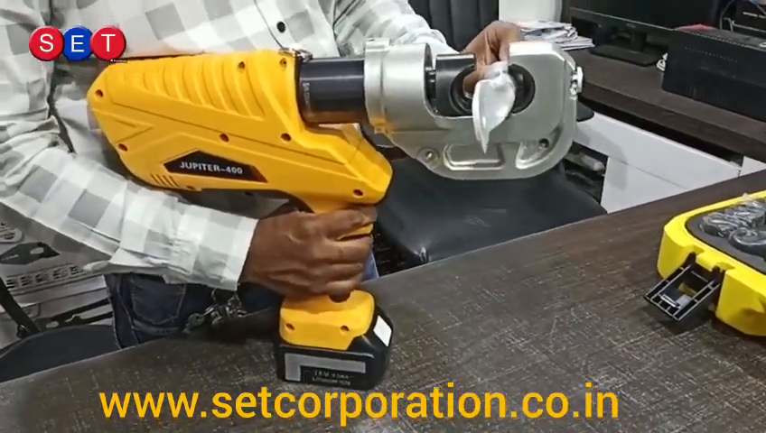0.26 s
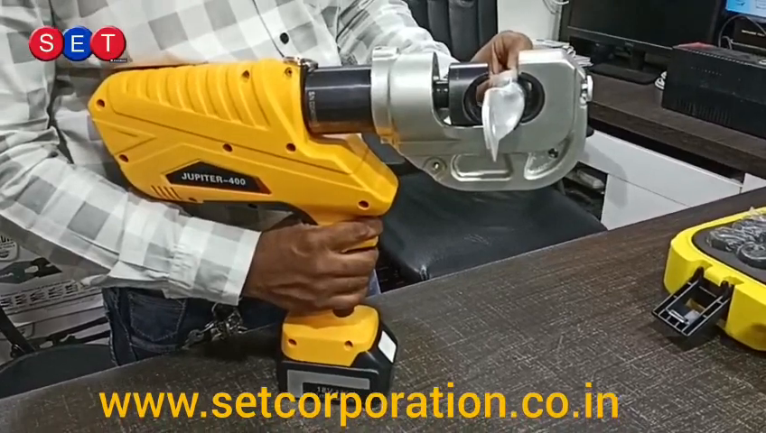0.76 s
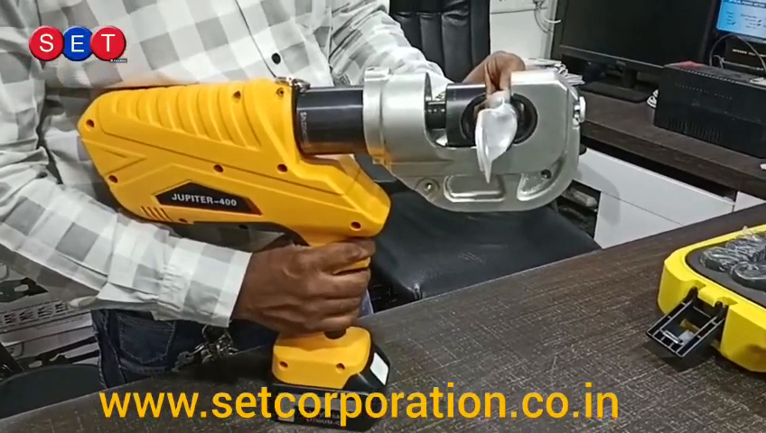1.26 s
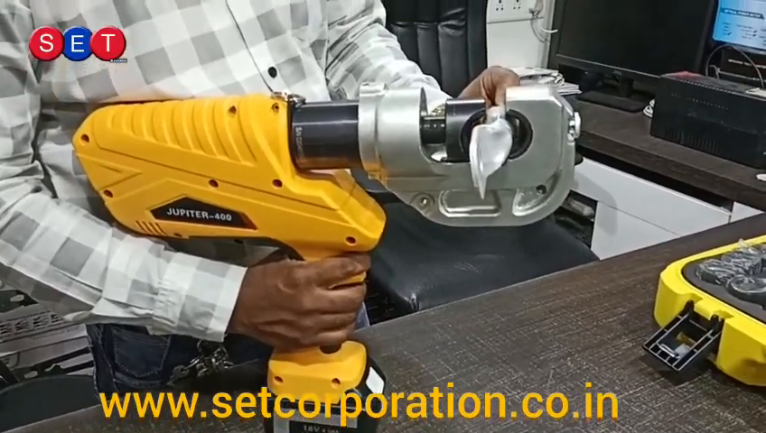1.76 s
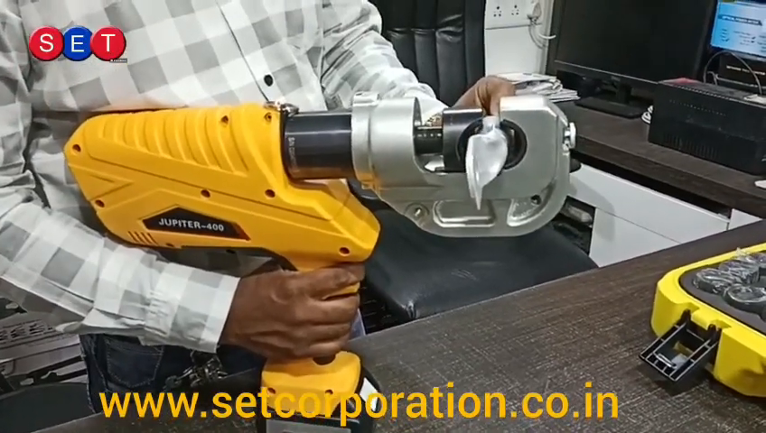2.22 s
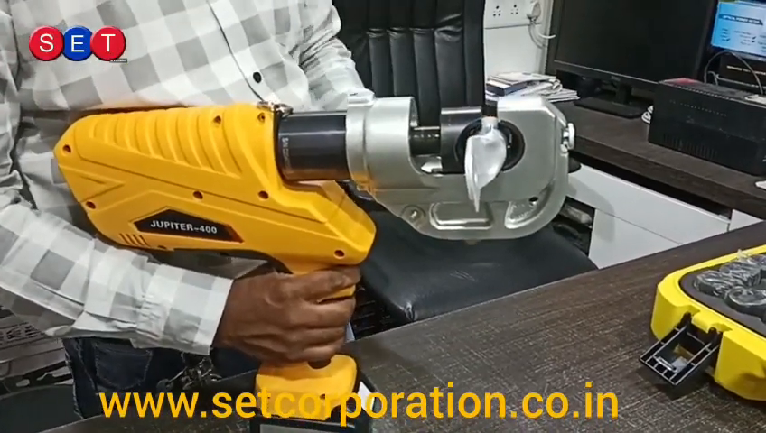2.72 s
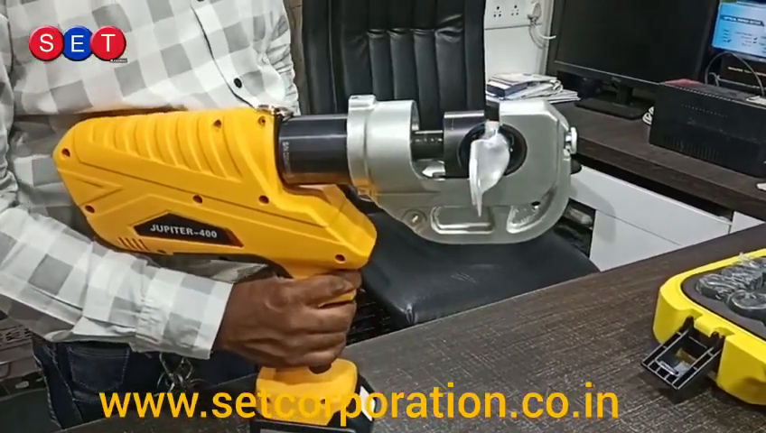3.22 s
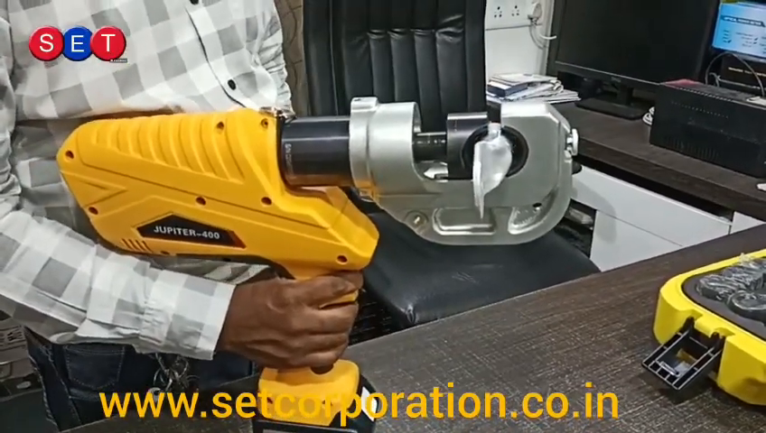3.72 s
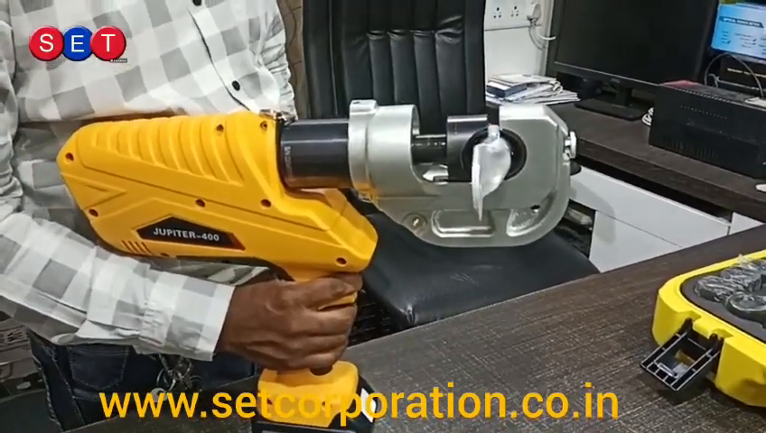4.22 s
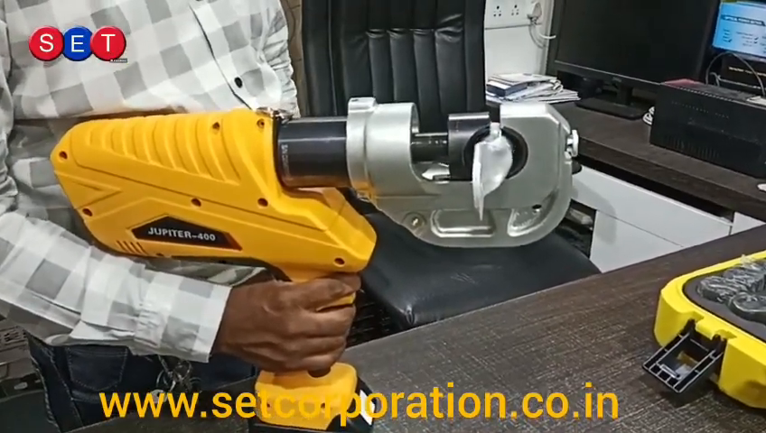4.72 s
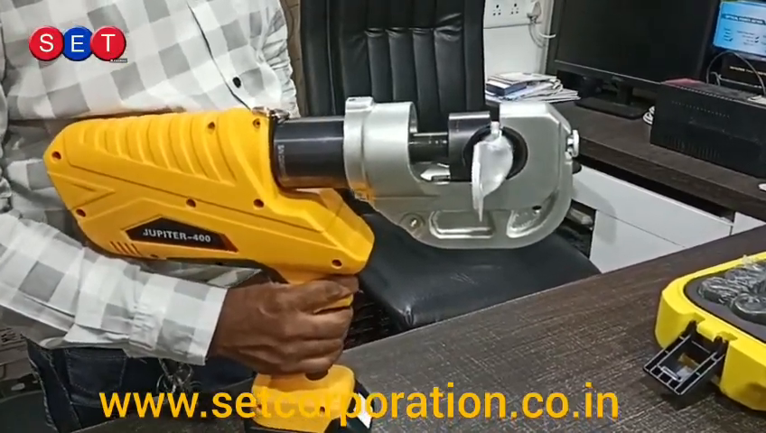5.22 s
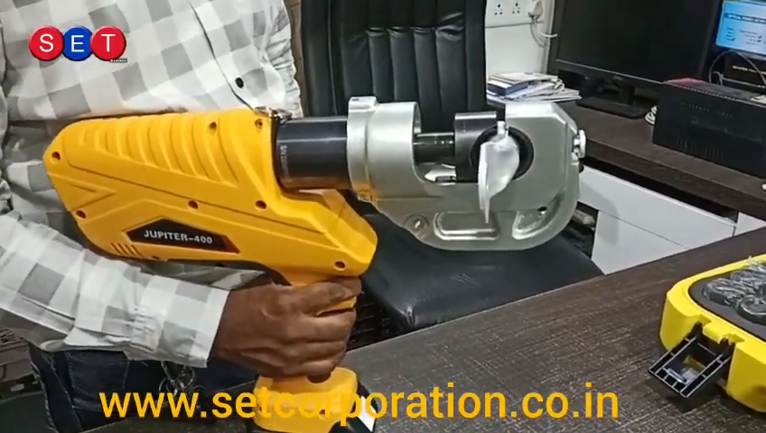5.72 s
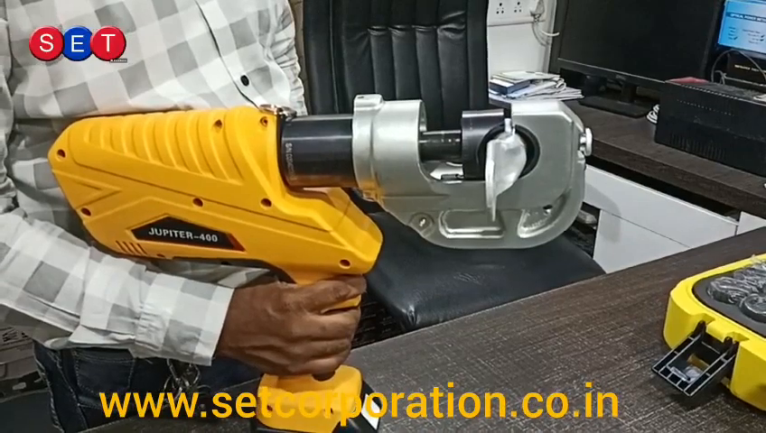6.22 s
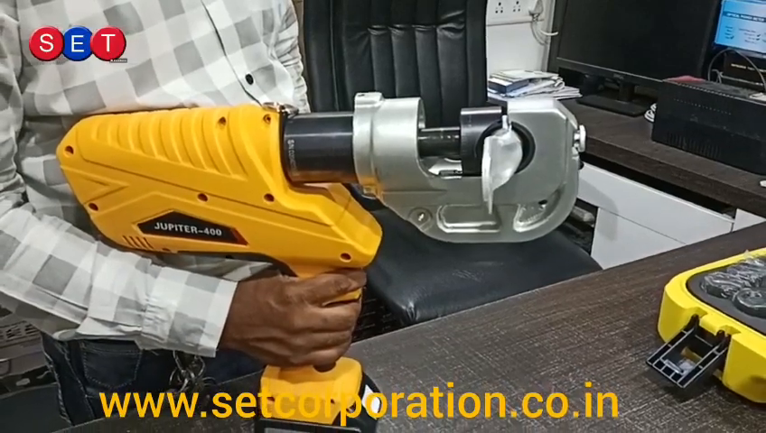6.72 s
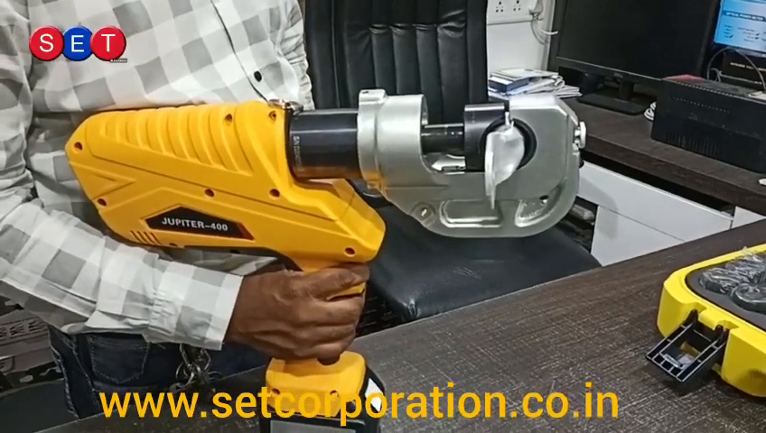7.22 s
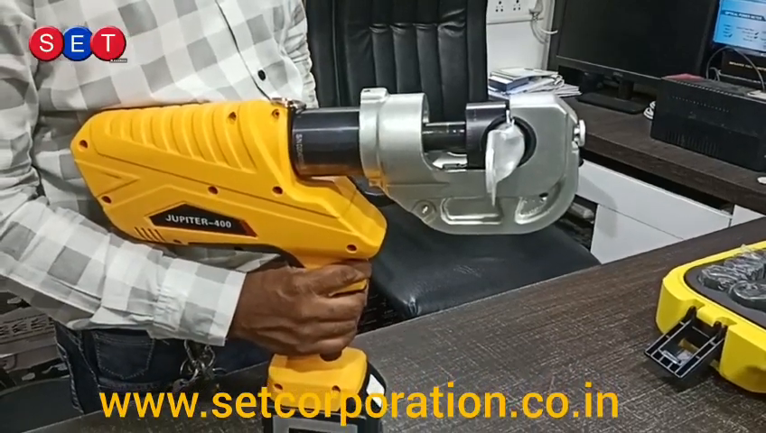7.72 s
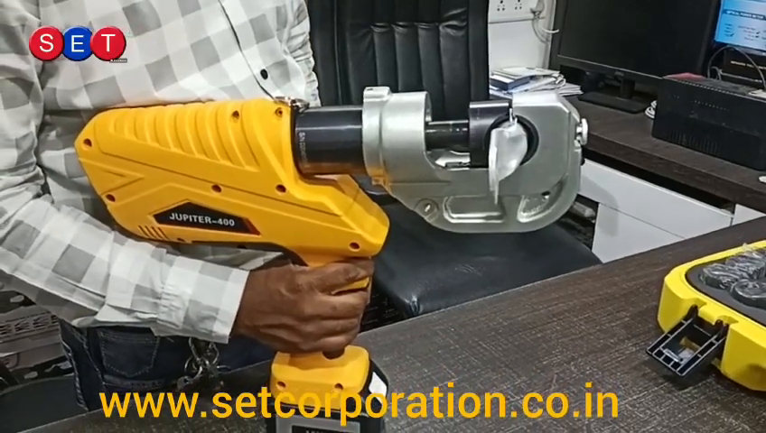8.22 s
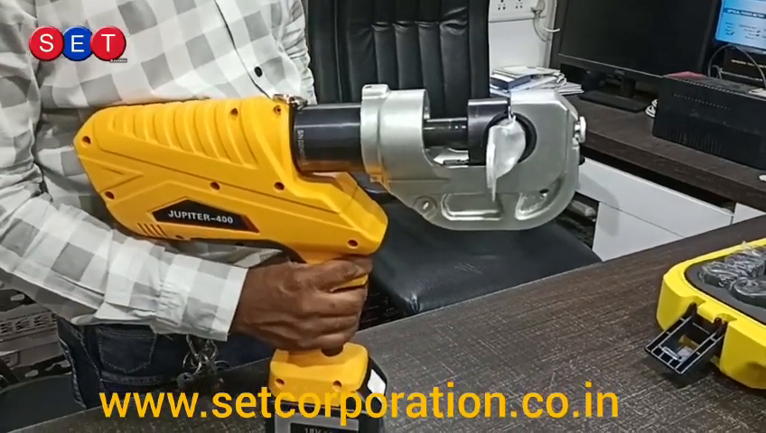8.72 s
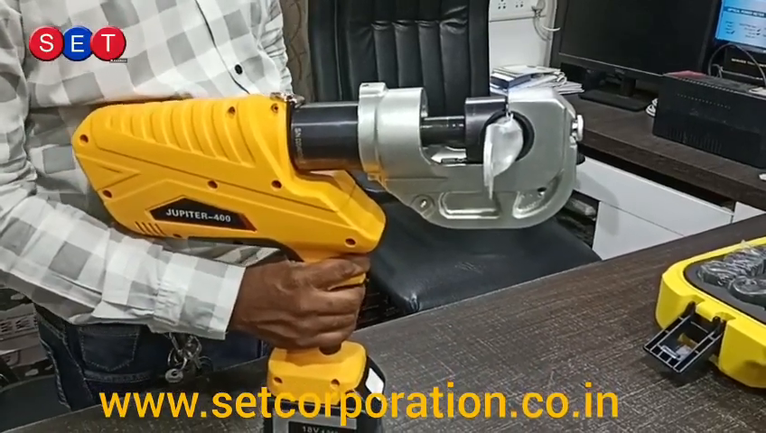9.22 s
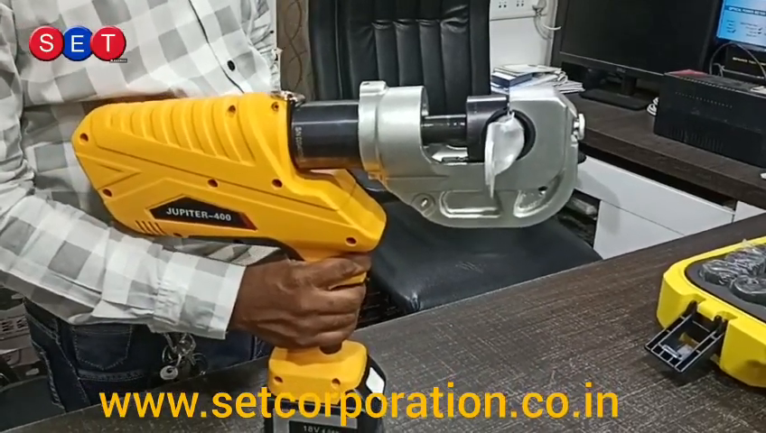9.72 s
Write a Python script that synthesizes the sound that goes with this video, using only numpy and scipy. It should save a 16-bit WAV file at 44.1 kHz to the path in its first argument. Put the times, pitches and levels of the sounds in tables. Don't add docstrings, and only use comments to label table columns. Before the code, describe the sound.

A battery-powered hydraulic crimping tool runs continuously in a small office, an arm's length from a stereo phone microphone. A shrill gear whine rides over dense rattling that pulses about eighteen times a second. Soft hand and table thumps sit underneath. As pressure rises the pulse slows slightly, the whine weakens, and metallic knocks and small falling squeals come forward. It is still running at the end.

```python
import sys
import numpy as np
from scipy import signal
from scipy.fft import rfft, irfft, next_fast_len
from scipy.io import wavfile
from scipy.ndimage import uniform_filter1d

SR = 44100
rng = np.random.default_rng(int(sys.argv[2]) if len(sys.argv) > 2 else 0)


def linear_from_db(decibels):
    return 10 ** (np.asarray(decibels, float) / 20)


def bounce(signal):
    frames = np.transpose(np.atleast_2d(signal))
    limited = np.clip(frames, -1, 1)
    pcm = np.round(limited * 32767).astype(np.int16)
    wavfile.write(sys.argv[1], SR, pcm)


N = 439236
TIME = np.arange(N) / SR

# (time [s], level [dB], length [s])
THUMPS = [(.15, -62, 0.17), (.36, -59, .05), (.58, -52, 0.1), (0.94, -61, 0.17), (1.47, -69, .05),
          (1.8, -68, 0.1), (2.185, -66, .04), (2.53, -66, .06), (3.08, -61, 0.1), (3.35, -58, .06),
          (3.533, -65, .05), (3.9, -60, 0.27), (4.238, -60, .05), (4.45, -55, 0.14), (4.96, -68, .06),
          (5.77, -73, .07), (6.132, -71, .1), (7.41, -72, 0.066), (7.76, -76, .06), (9.96, -78, .06)]
# (frequency [Hz], level [dB per Hz])
RUMBLE_COLOUR = [(20, -17), (50, -15), (70, -2), (85, -6), (105, -2.5), (150, 2.5), (200, -8), (260, -61)]
# (frequency [Hz], share [0-1])
SHARED = [(100, 0.97), (600, 0.87), (1200, 0.72), (2500, 0.047), (6000, 0.065), (12000, 0.05)]
# (frequency [Hz], left over right [dB])
TILT = [(100, 2), (200, 7), (400, 1), (700, -0.5), (1300, -0.5), (2400, 4), (4400, 0), (8000, 6),
        (15000, 3.5)]
# (time [s], pressure [0-1])
PRESSURE = [(0, 0.12), (1, 0.25), (2, .23), (2.5, 0.43), (3, 0.42), (5, 0.44), (6, 0.38), (6.6, 0.46),
            (7.2, 0.54), (7.6, 0.6), (8.2, 0.72), (9.96, 0.86)]
# (time [s], strokes lost [1/s])
SLOWING = [(0, 0), (4.15, 0), (4.75, .33), (6.25, .5), (7.75, .95), (9, 1.82), (9.96, 2.2)]
# (frequency [Hz], level [dB per Hz])
FREE_COLOUR = [(59, -72), (100, -25), (346, -13), (455, -8), (598, -7.5), (1360, -4), (1710, 0), (1900, -7),
               (4600, -12.5), (5220, -1.5), (5680, -8.5), (7320, -12), (7960, -32), (10900, -19),
               (15300, -25.5)]
# (frequency [Hz], level [dB per Hz])
PRESSED_COLOUR = [(59, -79), (100, -57), (269, -20.5), (485, -25.5), (637, 1.5), (892, -9.5), (1480, 2.5),
                  (1940, -2), (3890, -4), (4320, -4.5), (5220, -4.5), (6870, -7.5), (9030, -24),
                  (12100, -13), (15300, -20)]
# (frequency [Hz], width [Hz], gain [dB])
HOUSING = [(268, 173, 10.5), (400.6, 8.6, 8), (448.5, 85, -15), (320, 16, -4), (870, 77, -2),
           (615, 120, 2.5), (824, 27, 4), (996, 82, 5.5), (1234, 60, 4), (1490, 720, -2), (1750, 25, 2.5),
           (2235, 460, 5), (2780, 38, 3.5), (3640, 74, 5.5), (3050, 82, 7.5), (3420, 87, 6),
           (5270, 220, 6.5), (6590, 420, 3.5), (10300, 460, -6)]
# (from [Hz], to [Hz], start place [0-1], length [strokes], level [dB], octave level [dB])
SQUEAL = (4250, 3250, .74, .36, -25, -17)
# (place [0-1], scatter of place [strokes], strongest level [dB],
# pressure where strongest [0-1], loss away from it [dB per unit of pressure])
KNOCKS = [
    (.9, .01, -15.5, 1, 16),
    (.125, .01, -17, 1, 16),
    (.23, .03, -19, 1, 22),
    (.01, .04, -23, 1, 12),
    (.91, .01, -17, .5, 22),
]
# (frequency [Hz], t60 [s], level [dB], level [dB], level [dB], level [dB], level [dB])
HEAD = [(686, 0.065, -12.5, -20.5, -27, -21, -28), (1004, 0.05, -28, -11, -3.5, -27, -10),
        (1515, 0.03, 0.5, -21, 4.5, 7, -20), (1762, 0.014, 9, -4, -19, -18, -17),
        (2257, 0.025, -0.5, -1, -0.5, -8, -1.5), (2565, 0.021, -12, 3, -25, -6, 2),
        (2748, 0.025, -1.5, 1, 10, -12, -15), (3260, 0.023, -8, 2.5, 4.5, 9, -19),
        (3920, 0.02, -10, 3.5, -12, 4, -22), (4620, 0.0097, -24, -4, -20, -16, -18),
        (5400, 0.011, -20, -20, -20, -14, 1.5), (5600, 0.0089, -15, -11, -16, -12, 6),
        (6700, 0.0092, -25, -16, -24, -23, -24)]
# (time [s], pitch [Hz])
MESH_PITCH = [(0, 5315), (.4, 5328), (1.7, 5320), (2.2, 5340), (3.75, 5335), (4, 5260), (4.7, 5250),
              (5, 5235), (6.25, 5225), (7.75, 5160), (8, 5085), (9.96, 5068)]
# (time [s], level [dB], left over right [dB])
WHINE_BEAM = [(0, -26.5, 1), (.3, -25.5, -6), (.86, -23.5, .5), (2.08, -23, 2), (2.66, -26, 0.5),
              (3.35, -29.5, 10), (3.7, -26.5, 0.5), (4.1, -30, 6), (5.3, -30.5, 12), (6.8, -27, 7),
              (7.68, -31, 13), (7.9, -36.5, 8), (8.82, -37.5, 5), (9.57, -37, 5), (9.96, -44, 3)]
# (frequency [Hz], width [Hz], gain [dB])
GEARCASE = [(5320, 45, 5), (5225, 45, 5), (5110, 45, 4), (5050, 45, 4)]
# (multiple of shaft speed [1], level [dB], left over right [dB])
SHAFT_ORDERS = [(5, -34, 3.5), (9, -40, -20.5), (2, -46, -11)]
# (sag [share], eased by [share], centre [s], width [s])
BITE = (.013, .02, 3.7, 1.5)

STILL_DB, STIR_DB, STIR_S, AIR_DB = -79, 4.5, .06, -78
LAG_S = 0.00016
REGRIP_S, REGRIP_LENGTH_S = 2.55, .6
RATTLE_DB, SIDE_DB, HUM_DB = (-21.5, -23), (-2.5, -0.14), (-39.5, -44)
FREE_STROKES_PER_S, FIRST_PLACE = 18.31, -.38
FREE_SAG, EXTRA_SAG, SAG_KNEE = .025, .062, 1.7
SAG_CREEP_PER_S, CREEP_ENDS_S = .0022, 4
TEETH = 15
SWING_DB, SWING_S = 0.24, 0.083
HUM_DAMPED_FROM, HUM_LOSS_DB = .46, 47
OCTAVE_SWELL_DB, OCTAVE_BEST_S = 9, 3.4


def evened(x):
    return x / np.sqrt(np.mean(x ** 2) + 1e-20)


def columns(rows):
    s, *values = np.transpose(rows)
    return [np.interp(TIME, s, v) for v in values]


def read(points, hz):
    f, value = np.transpose(points)
    return np.interp(np.log(hz + 1), np.log(f + 1), value)


def coloured(x, db_at):
    size = next_fast_len(N)
    gain = linear_from_db(db_at(np.fft.rfftfreq(size, 1 / SR)))
    return irfft(rfft(x, size) * gain, size)[..., :N]


def wander(seconds):
    width = round(seconds * SR)
    once = uniform_filter1d(rng.standard_normal(N), width)
    return evened(uniform_filter1d(once, width))


def peaks(modes):
    return lambda hz: sum(db / (1 + (2 * (hz - f) / width) ** 2) for f, width, db in modes)


def regrip(before, after):
    return before + (after - before) * np.clip((TIME - REGRIP_S) / REGRIP_LENGTH_S, 0, 1)


def paired(a, b):
    def share(hz):
        return np.clip(read(SHARED, hz), .01, .99)

    alike = coloured(a, lambda hz: 20 * np.log10(share(hz)))
    apart = coloured(b, lambda hz: 10 * np.log10(1 - share(hz) ** 2))
    return np.array([a, alike + apart])


def rumble():
    low = coloured(rng.standard_normal((2, N)), lambda hz: read(RUMBLE_COLOUR, hz))
    level = linear_from_db(STILL_DB + STIR_DB * wander(STIR_S))
    s, db, length = np.transpose(THUMPS)[..., None]
    coarse = TIME[::100]
    thumps = (linear_from_db(db) * np.exp(-((coarse - s) / length) ** 2)).sum(0)
    level = level + np.interp(TIME, coarse, thumps)
    air = evened(coloured(rng.standard_normal(N), lambda hz: -40 / (1 + (45 / (hz + 1)) ** 6)))
    nearly_mono = evened(low[0] + 0.19 * low[1] * np.array([[1], [-1]]))
    return level * nearly_mono + linear_from_db(AIR_DB + 4 * wander(.07)) * air


def office(x):
    size = next_fast_len(N + SR // 2)
    hz, t = np.fft.rfftfreq(size, 1 / SR), np.arange(SR // 3) / SR
    share = np.clip(read(SHARED, hz), 0, 1)
    wet = linear_from_db(-12.0 + 2.4 / (1 + (hz / 4500) ** 6) - 8 / (1 + (hz / 450) ** 4))
    heard = rfft(x, size)
    for k in range(3):
        tails = rng.standard_normal((2, len(t))) * linear_from_db(-60 * t / 0.14) * (t > .003)
        near, other = rfft(tails / np.linalg.norm(tails[0]), size)
        echo = np.array([near, share * near + np.sqrt(1 - share ** 2) * other])
        window = np.sqrt(2 / 3) * np.cos(np.pi * (0.607 * TIME + k / 3))
        heard = heard + wet * rfft(x * window, size) * echo
    heard[0] *= np.exp(-2j * np.pi * hz * LAG_S)
    low_cut = 1 / np.sqrt(1 + (215 / (hz + 1)) ** 10)
    balance = linear_from_db(np.array([[1], [-1]]) * read(TILT, hz) / 2)
    return irfft(heard * low_cut * balance, size)[:, :N]


def seal(place):
    from_hz, to_hz, start, length, db, octave_db = SQUEAL
    along = np.minimum((place - start) % 1 / length, 1)
    pitch = (from_hz + (to_hz - from_hz) * along) * (1 + 0.012 * wander(0.028))
    turns = 2 * np.pi * np.cumsum(pitch) / SR
    level_db = db + 30 * (columns(PRESSURE)[0] - 1) + 2.5 * wander(.006)
    level = linear_from_db(level_db) * np.sin(np.pi * along ** .6)
    return level * (np.sin(turns) + linear_from_db(octave_db) * np.sin(2 * turns))


def gears(place):
    level_db, pressure = regrip(*RATTLE_DB), columns(PRESSURE)[0]
    size_db = 1.95 * np.minimum(rng.exponential(1, N), 5) + 0.57 * wander(0.0024) + 0.54 * wander(0.022)
    ticks = paired(*(rng.standard_normal((2, N)) * linear_from_db(size_db)))
    housing = peaks(HOUSING)
    free = evened(coloured(ticks, lambda hz: read(FREE_COLOUR, hz) + housing(hz)))
    pressed = evened(coloured(ticks, lambda hz: read(PRESSED_COLOUR, hz) + housing(hz)))
    share = np.clip(pressure, 0, 1)
    swell_db = 2.8 * share ** 2 * np.cos(2 * np.pi * (place - .02))
    return linear_from_db(level_db + swell_db) * ((1 - share) * free + share * pressed)


def pump(strokes):
    pressure = columns(PRESSURE)[0]
    whole = np.arange(np.floor(strokes[0]), strokes[-1])
    blows = np.zeros((len(HEAD), 2, N))
    for k, (place, scatter, db, best, loss_db) in enumerate(KNOCKS):
        chance = rng.standard_normal((len(whole), 2 + len(HEAD), 2))
        landing = whole + place - (place > .5) + scatter * chance[:, 0, 0]
        at = np.interp(landing, strokes, np.arange(N)).clip(0, N - 61).astype(int)
        size_db = db - loss_db * abs(pressure[at] - best) + 1.0 * chance[:, 1, 0]
        for m, row in enumerate(HEAD):
            late = rng.integers(0, 30, (len(whole), 2))
            for side in range(2):
                mode_db = row[2 + k] + 1.8 * chance[:, 2 + m, side]
                blows[m, side, at + late[:, side]] += linear_from_db(size_db + mode_db)
    t, out = np.arange(3000) / SR, np.zeros((2, N))
    for (hz, t60, *_), train in zip(HEAD, blows):
        ring = linear_from_db(-60 * t / t60) * (1 - np.exp(-t / .001)) * np.sin(2 * np.pi * hz * t)
        out += signal.oaconvolve(train, ring[None], axes=1)[:, :N]
    return paired(*coloured(out, lambda hz: -30 / (1 + (hz / 520) ** 8)))


def motor(place):
    top_hz, (whine_db, pan_db) = columns(MESH_PITCH)[0], columns(WHINE_BEAM)
    loaded_sag = FREE_SAG + EXTRA_SAG * np.tanh(columns(SLOWING)[0] / SAG_KNEE)
    slack_sag = FREE_SAG + SAG_CREEP_PER_S * np.minimum(TIME, CREEP_ENDS_S)
    sag = np.maximum(loaded_sag, slack_sag)
    whine_db = whine_db + SWING_DB * wander(SWING_S)
    hum_db = regrip(*HUM_DB) - HUM_LOSS_DB * np.maximum(columns(PRESSURE)[0] - HUM_DAMPED_FROM, 0)

    climb = (place - .1) % 1
    recover = 1 - climb / (.85 - 5 * sag)
    fall = 1 - (1 - climb) / (.1 + 3 * sag)
    drag = uniform_filter1d(np.maximum(recover, 0) ** 1.3 + np.maximum(fall, 0), 200)
    unsteady = .001 * wander(.012) + .001 * wander(.1)
    speed = top_hz / TEETH * (1 - .9 * sag * drag + unsteady)
    turns = 2 * np.pi * np.cumsum(speed) / SR

    bite_sag, eased, centre_s, width_s = BITE
    excess = sag - bite_sag - eased * np.exp(-((TIME - centre_s) / width_s) ** 2)
    bite_db = -480 * excess * drag + 1.2 * wander(.004) + .8 * wander(.02)
    mesh = coloured(linear_from_db(bite_db) * np.sin(TEETH * turns), peaks(GEARCASE))
    whine = evened(mesh) * linear_from_db(whine_db + 53 * sag - 2.0)
    swell_db = OCTAVE_SWELL_DB * np.exp(-((TIME - OCTAVE_BEST_S) / 0.7) ** 2)
    octave = linear_from_db(-45 + swell_db + 2.4 * (whine_db + 25) + bite_db) * np.sin(2 * TEETH * turns)
    hum = np.sqrt(2) * linear_from_db(hum_db - 4.0 + 1.3 * wander(0.048)) * np.sin(turns)
    orders = 0
    for k, db, side_db in SHAFT_ORDERS:
        flutter_db, jitter = 3 * wander(.006), 1.5 * wander(.008)
        level = linear_from_db(db + flutter_db + np.array([[side_db], [-side_db]]) / 2)
        orders = orders + level * np.sin(round(k) * turns + jitter)
    return (whine + octave) * linear_from_db(0.6 * np.array([pan_db, -pan_db])) + hum + orders


def scene():
    strokes = FIRST_PLACE + np.cumsum(FREE_STROKES_PER_S - columns(SLOWING)[0]) / SR
    place, pan_db = strokes % 1, regrip(*SIDE_DB)
    body = gears(place) + pump(strokes) + seal(place)
    body = body * linear_from_db(np.array([pan_db, -pan_db]) / 2 - 0.54)
    return office(body + motor(place)) + rumble()


def roll_off(x):
    return signal.sosfilt(signal.butter(12, 15630, fs=SR, output="sos"), x)


def record(dry):
    return roll_off(dry)


dry = scene()
out = record(dry)
bounce(out)
```